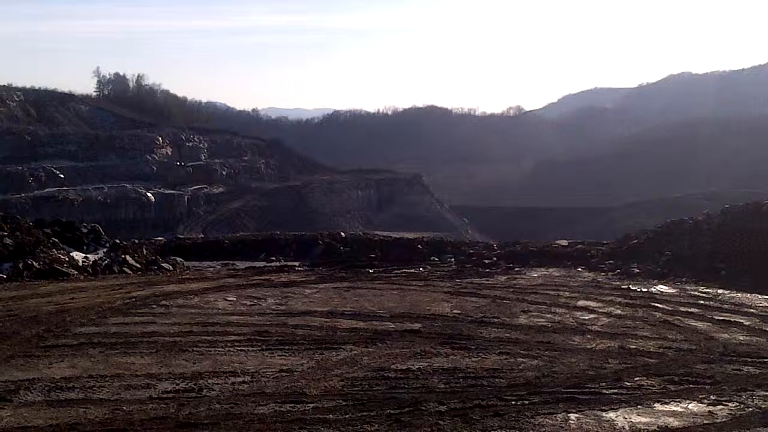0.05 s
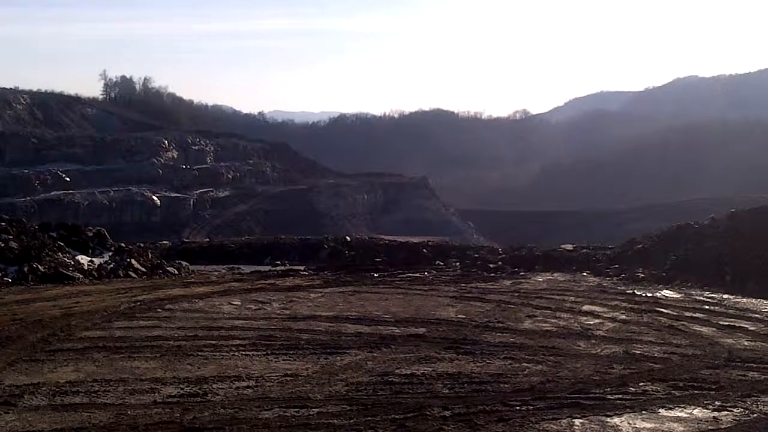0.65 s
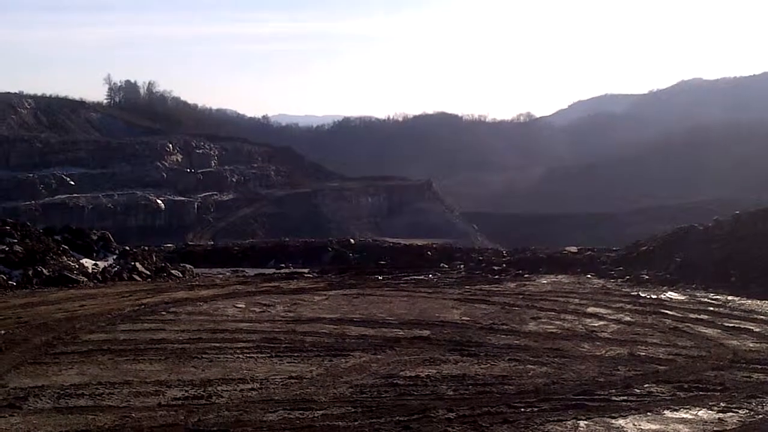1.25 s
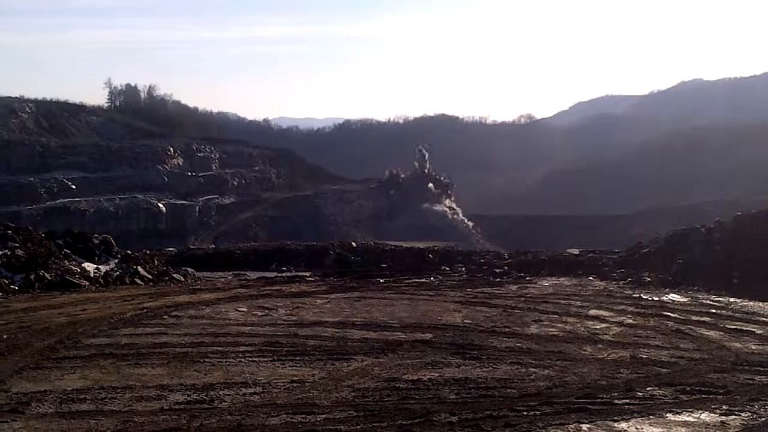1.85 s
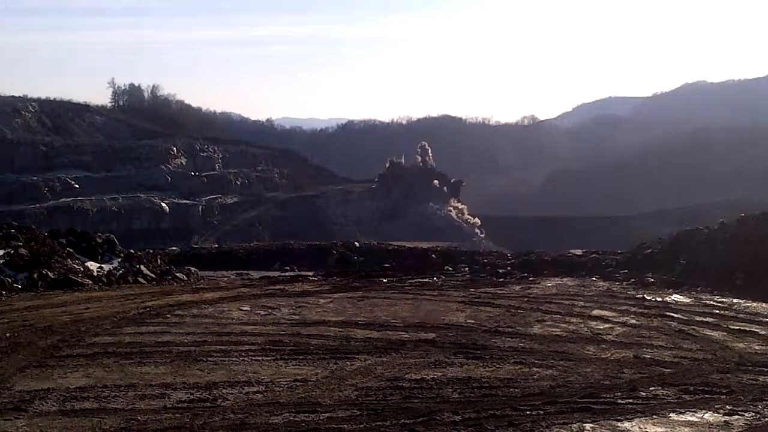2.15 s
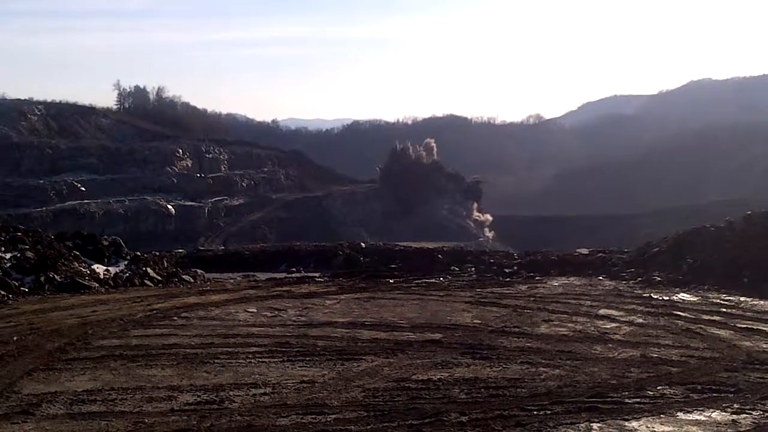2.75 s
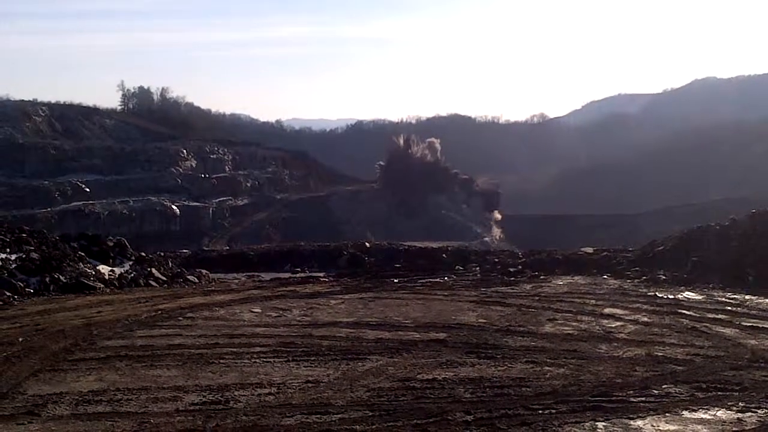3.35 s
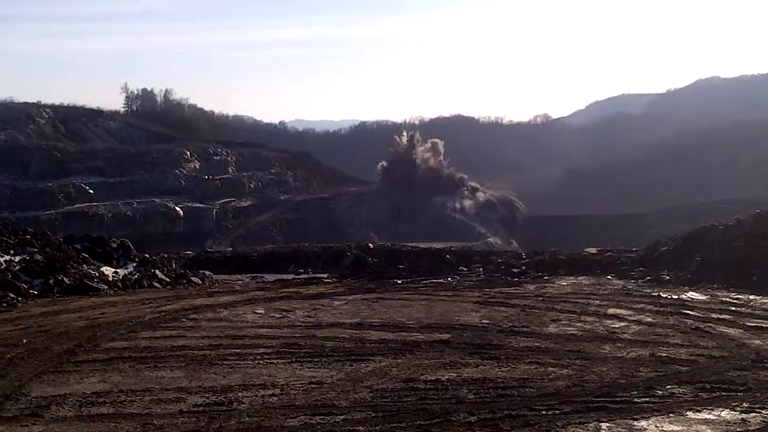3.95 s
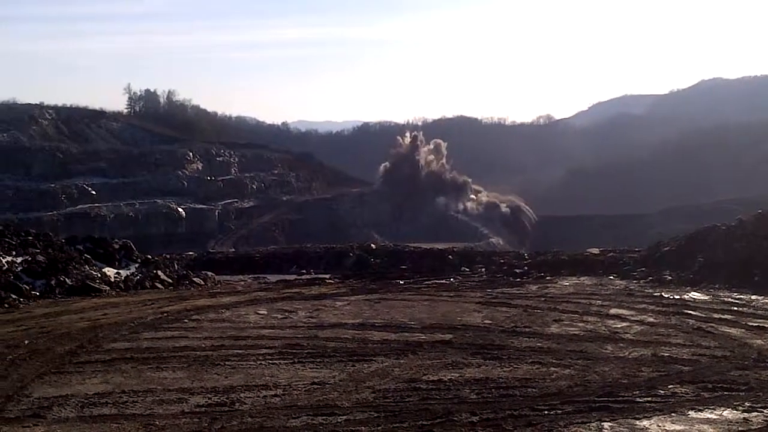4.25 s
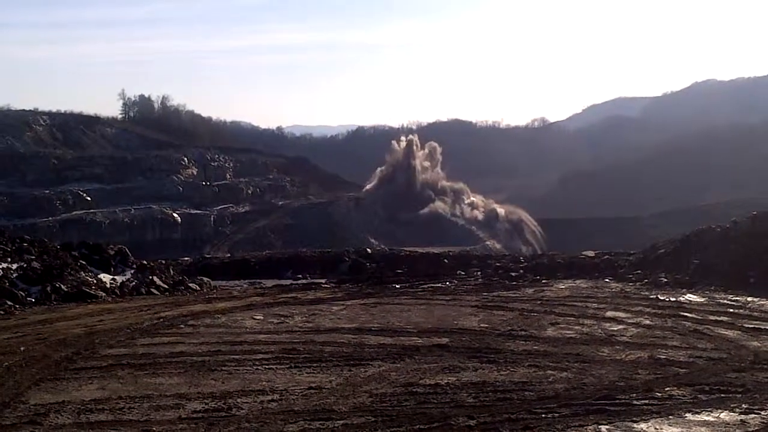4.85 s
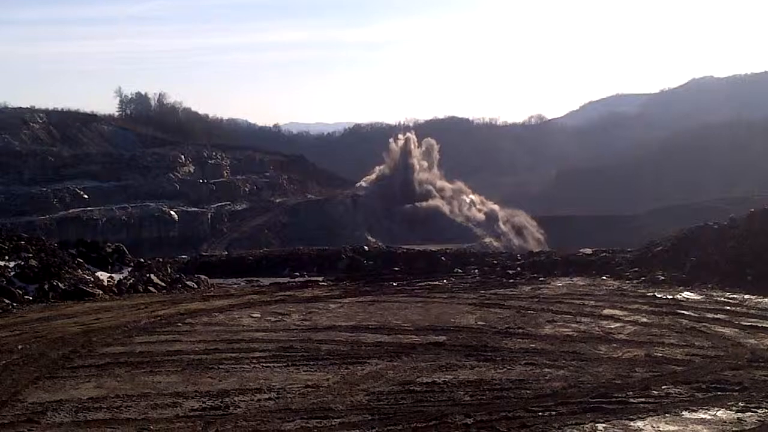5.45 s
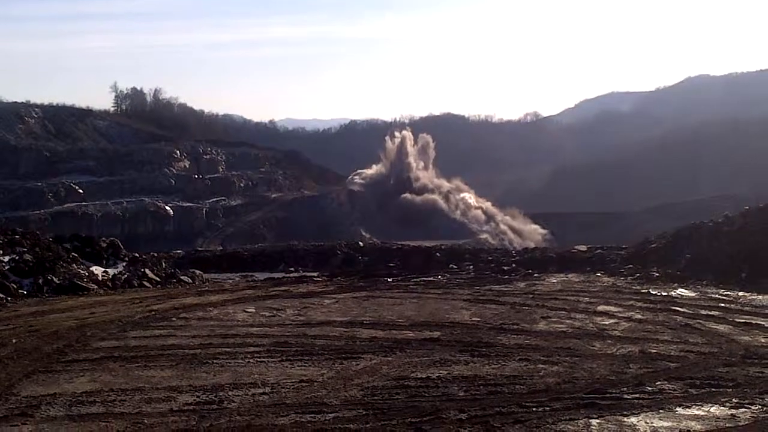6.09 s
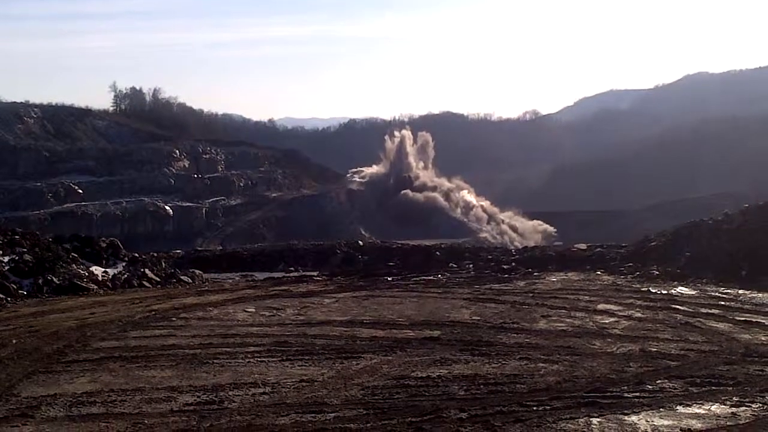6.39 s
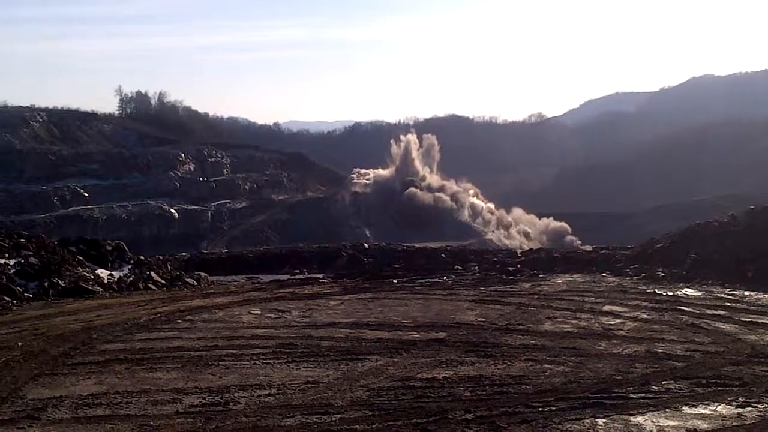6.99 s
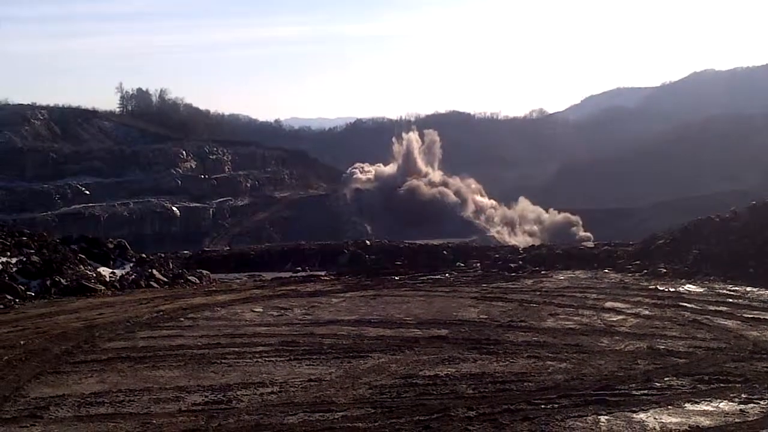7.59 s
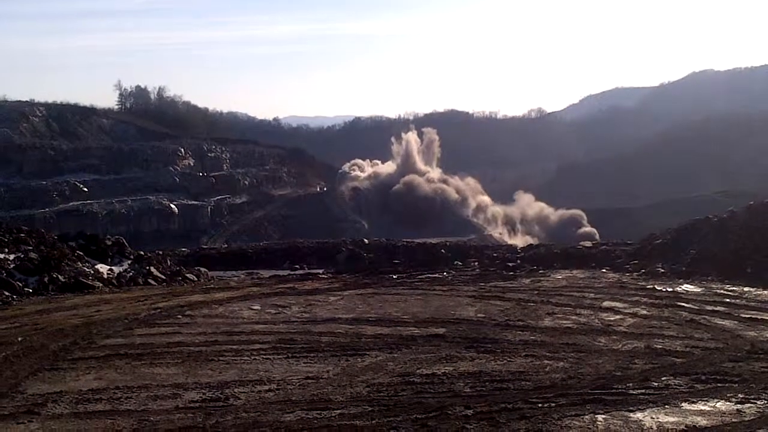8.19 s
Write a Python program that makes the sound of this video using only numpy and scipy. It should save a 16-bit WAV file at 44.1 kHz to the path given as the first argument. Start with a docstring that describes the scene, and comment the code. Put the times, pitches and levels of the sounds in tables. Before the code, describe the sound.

A distant rock blast booms and rumbles away, followed by a dull rush of falling rock over a low engine hum.

```python
"""Rock blast across an open mine

A distant volley of pressure fronts arrives as a sharp boom, which the pit scatters into a deep rumble.
It overloads the microphone in thin clicks. Thrown rock pours down in a dull rush, with a few boulders.
A diesel idles far off; close by, a camera's motor whines and its case clicks once."""
import sys
import numpy as np
from scipy.fft import rfft, irfft, next_fast_len
from scipy.io import wavfile
from scipy.ndimage import uniform_filter1d, map_coordinates

SR = 44100
rng = np.random.default_rng(int(sys.argv[2]) if len(sys.argv) > 2 else 0)


def store_pcm(level_fs):
    """Save levels as 16-bit WAV."""
    pcm = np.round(np.clip(level_fs, -1, 1) * 32767).astype(np.int16)
    wavfile.write(sys.argv[1], SR, np.atleast_2d(pcm).T)


N = 362943
TIME = np.arange(N) / SR


def amp(db):
    """Amplitude ratio of a level in decibels."""
    return 10 ** (np.asarray(db) / 20)


def unit(x):
    """Normalisation to rms 1."""
    return x / np.sqrt(np.mean(x ** 2) + 1e-20)


def wobble(rate):
    """Slow random modulation: a spline through `rate` Gaussian knots a second."""
    knots = rng.standard_normal(int(N * rate / SR) + 4)
    coarse = TIME[::128]
    return np.interp(TIME, coarse, map_coordinates(knots, [coarse * rate]))


def filtered(x, response):
    """Linear filtering: the spectrum of x times a frequency response."""
    size = next_fast_len(N + SR // 2)
    return irfft(rfft(x, size) * response(np.fft.rfftfreq(size, 1 / SR)), size)[:N]


def coloured(x, spectrum):
    """Spectral shaping by (frequency [Hz], gain [dB]) points on a log-frequency axis."""
    f, db = np.transpose(spectrum)
    return filtered(x, lambda hz: amp(np.interp(np.log(hz + 1), np.log(f + 1), db)))


def noise(spectrum):
    """Coloured Gaussian noise of rms 1."""
    return unit(coloured(rng.standard_normal(N), spectrum))


def envelope(start_s, attack_s, hold_s, fall_db_per_s):
    """Linear rise to 1, hold and exponential decay."""
    t = TIME - start_s
    return np.clip(t / attack_s, 0, 1) * amp(-fall_db_per_s * np.maximum(t - attack_s - hold_s, 0))


# Spectra of the mine's murmur and the camera's hiss: (frequency [Hz], relative level [dB])
MURMUR_SPECTRUM = [(4, -14), (16, 14.5), (25, 2), (55, -2.5), (90, 0), (125, -3), (160, -1), (200, -4.5),
                   (255, -3), (330, -11), (410, -6), (600, -13), (1200, -22.5), (2500, -40)]
HISS_SPECTRUM = [(100, 0), (3800, 2), (5000, 0.71), (6300, 1.1), (8000, -1), (9200, -0.26), (11000, -1),
                 (15500, -1.5)]
# Steady tones of the camera's electronics: (frequency [Hz], rms level [dB])
WHISTLE_TONES = [(5852, -96), (12603, -95), (13474, -94)]


def background(murmur_db, hiss_db):
    """Noise floor: the low murmur of the mine's machines, with electronic hiss and faint whistles."""
    murmur = amp(murmur_db + 0.56 * wobble(4)) * noise(MURMUR_SPECTRUM)
    hiss = amp(hiss_db) * noise(HISS_SPECTRUM)
    whistles = sum(np.sqrt(2) * amp(db) * np.sin(2 * np.pi * hz * TIME) for hz, db in WHISTLE_TONES)
    return murmur + hiss + whistles


# Engine harmonics: (multiple of the four-stroke cycle rate [-], rms level [dB])
ENGINE_ORDERS = [(8, -53), (10, -69), (13, -63), (16, -57.5), (17, -58), (19, -61.5), (21, -70), (32, -65),
                 (33, -66.5), (35, -59.5)]
# Exhaust noise: (frequency [Hz], relative level [dB])
EXHAUST_SPECTRUM = [(60, -30), (120, -14), (150, -1), (170, 0), (190, -14), (240, -10), (330, -25),
                    (900, -60)]


def diesel(cycle_hz, waver_db, exhaust_db, throb_db):
    """Periodic firing makes harmonics; only low ones carry this far. The exhaust throbs once a cycle."""
    phase = 2 * np.pi * np.cumsum(cycle_hz * (1 + 0.0031 * wobble(2.014))) / SR
    orders = np.zeros(N)
    for k, db in ENGINE_ORDERS:
        gain = np.sqrt(2) * amp(db + waver_db * wobble(2.4))
        orders += gain * np.sin(k * phase + 2 * np.pi * rng.random())
    exhaust = amp(exhaust_db + throb_db * np.sin(phase)) * noise(EXHAUST_SPECTRUM)
    return orders + exhaust


# Motor speed, heard as the pitch of the whine: (time [s], frequency [Hz])
WHINE_PITCH = [(0.0, 995.4), (1.8, 995.3), (2.44, 992.4), (7.06, 991.7), (8.2, 994.9)]
# Partials of the whine: (frequency ratio [-], relative level [dB])
WHINE_PARTIALS = [(1 / 2, -8.5), (1, 0), (3 / 2, -21.3), (2, -28), (3, -37.5)]
# Resonances of the camera body: (frequency [Hz], half-width [Hz], relative level [dB])
BODY_RESONANCES = [(787, 79, -1), (880, 57, 1), (1005, 87, -5.5), (1136, 33, -13.5), (1300, 37, -16.5),
                   (1467, 61, -12), (1715, 210, -19.5), (2110, 170, -24.5), (2640, 162, -21.5),
                   (3016, 230, -27.5), (3800, 1000, -29)]


def motor(whine_db, flutter_db, flutter_rad, whirr_db):
    """Forced vibration: the camera's motor whines and drives the body's resonances into a whirr."""
    def body(f):
        return sum(amp(db) / (1 + ((f - centre) / width) ** 2) for centre, width, db in BODY_RESONANCES)

    hz = np.interp(TIME, *np.transpose(WHINE_PITCH))
    drifting_db = whine_db + 0.6 * wobble(3)
    load_db = 0.55 * (hz.mean() - hz)  # the main tone grows as the motor slows
    phase = 2 * np.pi * np.cumsum(hz) / SR + flutter_rad * wobble(14)
    whine = np.zeros(N)
    for k, db in WHINE_PARTIALS:
        level_db = drifting_db + db + load_db * (k == 1) + flutter_db * wobble(18)
        whine += np.sqrt(2) * amp(level_db) * np.sin(k * phase)
    whirr = unit(filtered(rng.standard_normal(N), body))
    return whine + amp(whirr_db + 0.63 * wobble(12)) * whirr


# Modes of the camera's plastic case: (frequency [Hz], initial level [dB], 60 dB decay time [s])
CASE_MODES = [(786, -27, 0.016), (1200, -29, .009), (1990, -29, 0.0075), (3230, -26.5, 0.0019),
              (6650, -21, 0.0017), (9200, -24.5, .002)]


def case_click(start_s, snap_db, snap_t60):
    """Free vibration: the case gives one noisy snap and rings briefly in its damped modes."""
    t = np.arange(SR // 20) / SR
    snap = amp(snap_db - 60 * t / snap_t60) * uniform_filter1d(rng.standard_normal(len(t)), size=2)
    ring = sum(amp(db - 60 * t / t60) * np.sin(2 * np.pi * hz * t) for hz, db, t60 in CASE_MODES)
    return np.pad(snap + ring, (round(start_s * SR), N))[:N]


def thud(centre_s, db, hz, cycles):
    """Gaussian wave packet: a heavy blow, softened by distance to about one cycle of low sound."""
    pulse = np.zeros(N)
    near = slice(int(centre_s * SR) - SR // 20, int(centre_s * SR) + SR // 20)
    periods = (TIME[near] - centre_s) * hz
    pulse[near] = amp(db) * np.cos(2 * np.pi * periods) * np.exp(-(periods / cycles) ** 2 / 2)
    return pulse


def stones(spectrum, per_s, spread_db, surge_db):
    """Shot noise of rms about 1: stones of random size land at random times, in slight surges."""
    lands = rng.random(N) < per_s / SR
    hits = lands * rng.choice([-1, 1], N) * amp(spread_db * rng.standard_normal(N))
    return amp(surge_db * wobble(7)) * unit(coloured(hits, spectrum))


# Impact spectra of blocks and rubble, dulled by distance: (frequency [Hz], relative level [dB])
BLOCK_SPECTRUM = [(30, -15), (90, -8), (140, -4), (190, -3), (250, 0), (295, -3), (345, -11), (600, -22),
                  (1200, -34), (3000, -65)]
RUBBLE_SPECTRUM = [(60, -3.5), (150, 1), (300, -2), (470, 1.5), (640, -0.5), (720, -2), (900, -3),
                   (1130, -10), (1230, -16), (1500, -19.5), (2100, -28.5), (5000, -60)]
# Landings of the heaviest boulders: (time [s], peak level [dB], frequency [Hz])
BOULDER_IMPACTS = [(5.708, -35, 340), (6.022, -32, 125), (7.828, -27, 115), (7.846, -32, 85)]


def rockfall(start_s):
    """Dense impacts merge into a rush: big blocks first, rubble more slowly; a few boulders stand out."""
    block_gain = amp(-47.8) * envelope(start_s, attack_s=1.05, hold_s=.7, fall_db_per_s=4.2)
    rubble_gain = amp(-47.4) * envelope(start_s, attack_s=1.95, hold_s=.55, fall_db_per_s=2.2)
    blocks = block_gain * stones(BLOCK_SPECTRUM, per_s=300, spread_db=3.5, surge_db=1.1)
    rubble = rubble_gain * stones(RUBBLE_SPECTRUM, per_s=2000, spread_db=3, surge_db=.4)
    boulders = sum(thud(s, db, hz, cycles=.45) for s, db, hz in BOULDER_IMPACTS)
    return blocks + rubble + boulders


def steepness(rise_s):
    """Steepness of a front: how many halvings its rise time lies below 1 ms."""
    return -np.log2(rise_s * 1000)


# Spectra of the wall echoes and of the pit's heaving air: (frequency [Hz], relative level [dB])
SCATTER_SPECTRUM = [(25, -16), (60, -1.5), (135, 3.5), (250, -3), (330, -8), (450, -11), (600, -14),
                    (690, -13), (800, -24), (1400, -28), (2200, -49), (5000, -75)]
HEAVE_SPECTRUM = [(5, -34), (11, -3), (17, 2), (24, -9), (35, -20), (60, -31), (200, -80)]


def pit_rumble(start_s, tail_db, tail_db_per_halving, surge_db, surge_fall_db):
    """Scattering: walls spread fronts into tails, booms into surges, the volley into a roll; air heaves."""
    tails = [amp(db + tail_db + tail_db_per_halving * steepness(rise))
             * envelope(s, attack_s=.003, hold_s=0, fall_db_per_s=300)
             for s, db, rise in PRESSURE_FRONTS]
    surges = [amp(db + surge_db)
              * envelope(s - build, attack_s=build, hold_s=0, fall_db_per_s=surge_fall_db / build)
              for s, db, _, build in BOOM_PULSES]
    roll = amp(-37.3) * envelope(start_s, attack_s=.018, hold_s=.15, fall_db_per_s=40)
    heave = amp(-25.3) * envelope(start_s, attack_s=.03, hold_s=.28, fall_db_per_s=30)
    scatter = np.linalg.norm(tails + surges + [roll], axis=0)  # incoherent sounds add in power
    return scatter * noise(SCATTER_SPECTRUM) + heave * noise(HEAVE_SPECTRUM)


# Click of the saturating microphone: (frequency [Hz], relative level [dB])
OVERLOAD_CLICK_SPECTRUM = [(100, -8), (600, 0), (1500, 5), (3500, -1), (5500, -13), (9000, -32),
                           (16000, -50)]


def overload_clicks(share_db, db_per_halving):
    """Saturation: thin clicks as the blast overloads the microphone, strongest at the steepest swings."""
    s, db, rise = np.transpose(PRESSURE_FRONTS)
    strength = amp(db + share_db + db_per_halving * steepness(rise))
    impulses = np.bincount(np.round(s * SR).astype(int), weights=strength, minlength=N)
    clicks = coloured(impulses, OVERLOAD_CLICK_SPECTRUM)
    return clicks * strength.max() / np.abs(clicks).max()


# Fronts from the staggered charges: (time [s], level [dB], rise time [s])
PRESSURE_FRONTS = [(3.339, -14, .002), (3.361, -18.5, .0007), (3.376, -15, .0014), (3.4132, -18, .0006),
                   (3.4572, -17, .0007), (3.526, -17, .0016), (3.5615, -17, .0015), (3.5855, -11, .0026),
                   (3.6233, -22, .0005), (3.7205, -12, .0027)]
# Main boom and a softer one: (time [s], peak level [dB], frequency [Hz], build-up of its surge [s])
BOOM_PULSES = [(3.365, -11, 175, .008), (3.562, -26.5, 135, .035)]


def blast(push_s):
    """Blast waves: each charge sends an overpressure, then a longer suction; two booms stand out."""
    fronts = np.zeros(N)
    for s, db, rise in PRESSURE_FRONTS:
        near = slice(int(s * SR) - SR // 20, int(s * SR) + SR // 2)
        t = TIME[near] - s
        onset = (1 + np.tanh(t / rise)) / 2
        age = np.maximum(t, 0) / push_s  # push turns to suction at 1
        fronts[near] += amp(db) * onset * (1 - age) * np.exp(-age)
    booms = sum(thud(s, db, hz, cycles=.5) for s, db, hz, _ in BOOM_PULSES)
    return fronts + booms


def scene():
    """Superposition: far and near sources add at one microphone."""
    far = blast(push_s=.018)
    far += pit_rumble(start_s=3.33, tail_db=-25, tail_db_per_halving=3, surge_db=-8.5, surge_fall_db=9)
    far += diesel(cycle_hz=4.765, waver_db=1.5, exhaust_db=-58.5, throb_db=5)
    far += rockfall(start_s=3.9)
    near = motor(whine_db=-50.2, flutter_db=1.03, flutter_rad=.12, whirr_db=-53.5)
    near += case_click(start_s=8.1321, snap_db=-36, snap_t60=.006)
    near += overload_clicks(share_db=-23.5, db_per_halving=7)
    return (far + near + background(murmur_db=-49.0, hiss_db=-67.6))[None]


def record(dry):
    """Overload and band limit: big slow pressure swings stiffen the microphone and duck all sound."""
    swing = filtered(dry[0], lambda hz: 1 / (1 + (hz / 60) ** 4))
    ducked = dry[0] / np.sqrt(1 + (swing / 0.115) ** 2)
    return filtered(ducked, lambda hz: hz < 15450)[None]


dry = scene()
out = record(dry)
store_pcm(out)
```